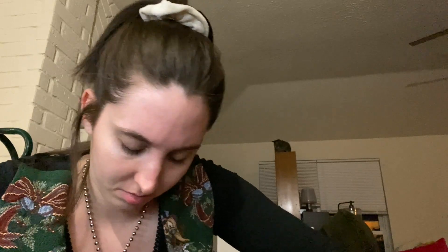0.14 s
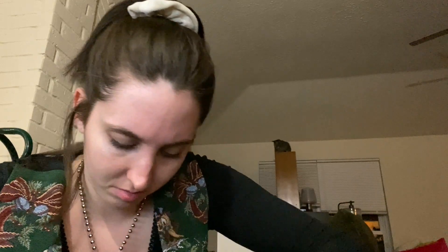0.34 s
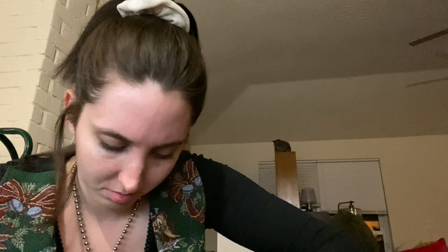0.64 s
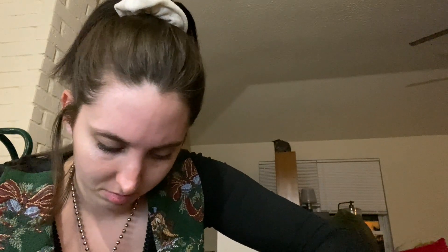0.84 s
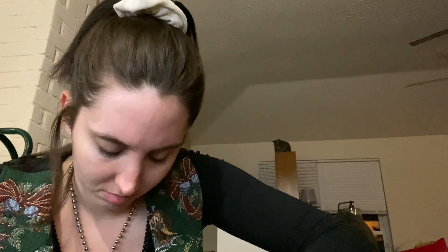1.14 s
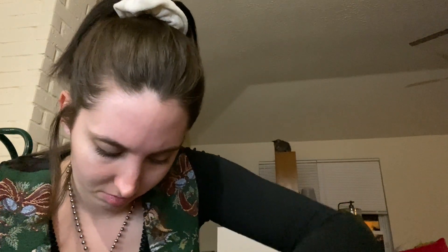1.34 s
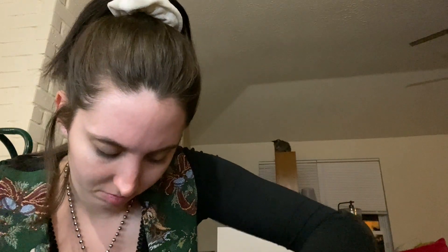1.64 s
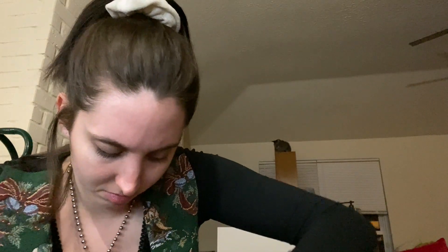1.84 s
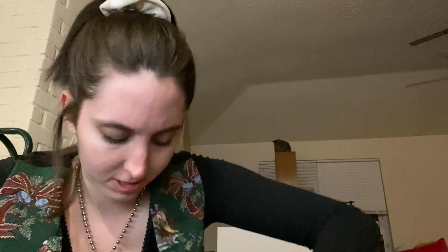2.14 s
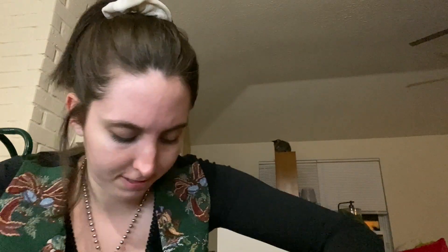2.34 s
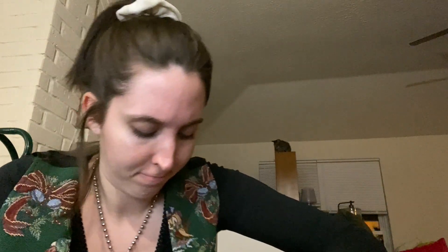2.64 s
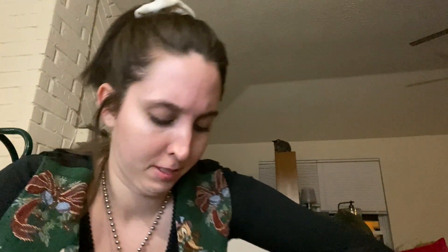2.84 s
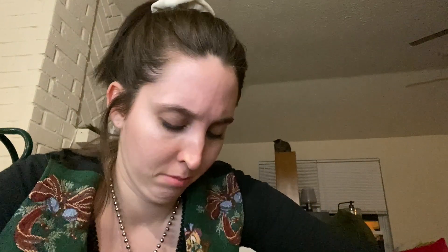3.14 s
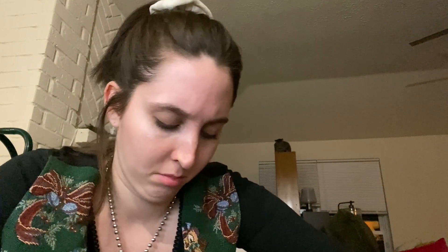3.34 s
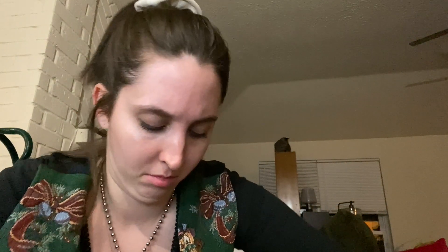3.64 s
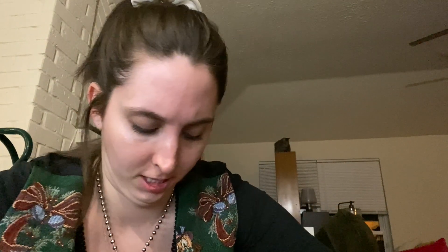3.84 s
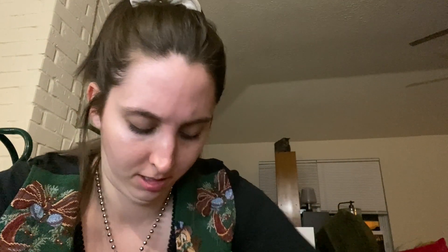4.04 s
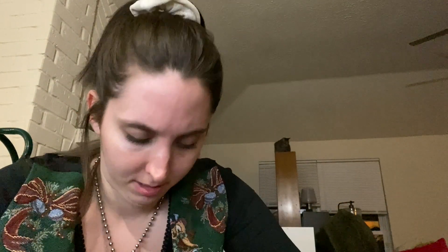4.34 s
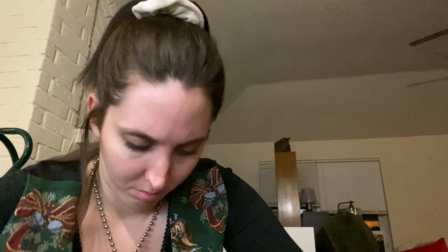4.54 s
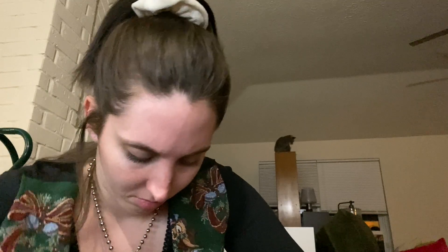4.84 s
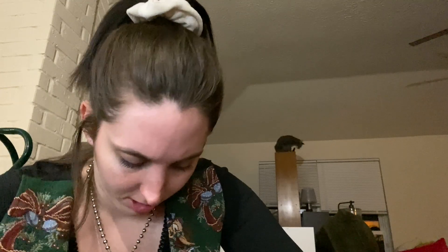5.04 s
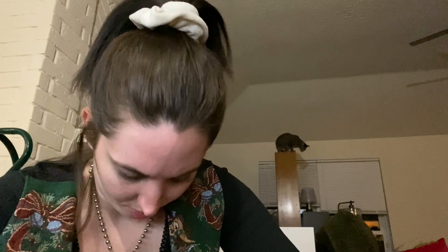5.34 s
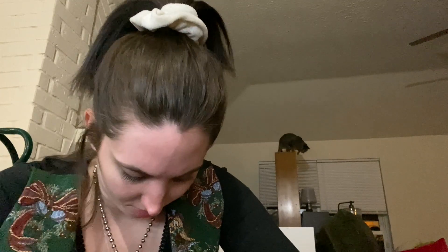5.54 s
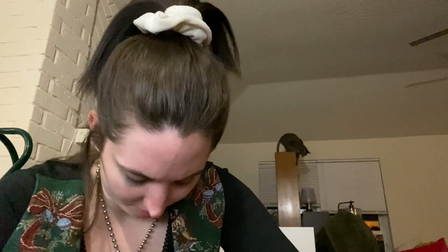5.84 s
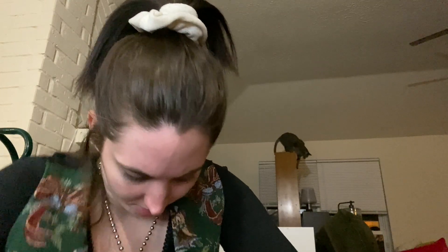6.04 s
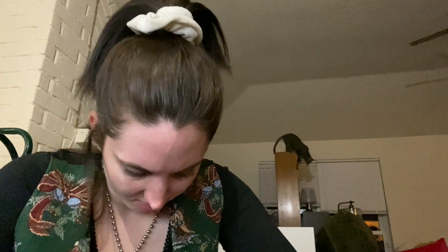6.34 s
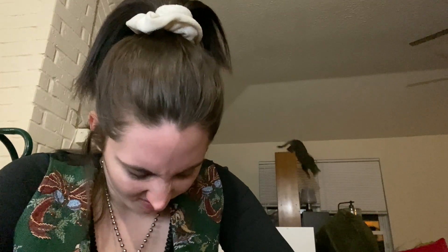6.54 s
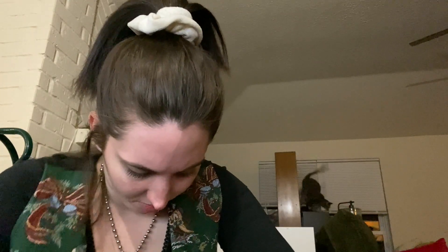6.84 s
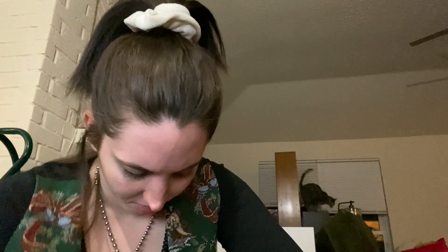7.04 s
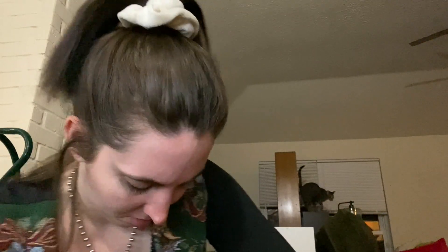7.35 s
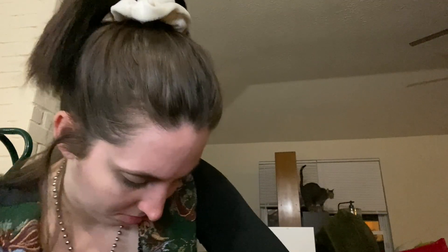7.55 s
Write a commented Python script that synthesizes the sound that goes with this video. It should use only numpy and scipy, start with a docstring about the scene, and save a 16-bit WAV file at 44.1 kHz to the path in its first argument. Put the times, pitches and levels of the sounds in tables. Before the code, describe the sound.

A close stereo pickup in a quiet, modestly echoing living room, with a faint low hum beneath. From 0 to 2.7 s fingers rub and pick at a taped cardboard box: soft papery hiss, scattered dry crinkles, brief tape squeaks, with ticks thickening after 1.1 s. At 2.8 and 2.96 s two sharp cracks start the seam. Lighter buckles and rubs follow, growing busy around 3.9 to 4.4 s. At 4.5 s a loud cluster of pops bursts out, then more at 5.15, 5.8, 6.35 and 7.1 s, each a hollow, woody snap with a bright edge, a short echo, and fibres crackling and board scraping after it. A short squeak comes near 5.4 s. Padded bumps land around 6.0, 6.5 and 6.7 s, and tiny high metal bead rings are barely audible. Small crinkles and knocks finish by 7.6 s.

```python
"""Fingers rub and pick at a taped cardboard box: the board crinkles, squeaks and bumps.
Then the seam gives way in a series of loud pops, and fibres crackle on after each one.
Every break runs through the board as a bending wave, treble first, and rings out in the living room.
Handling is built from tiny random slips, squeaks and bumps from gliding tones, the house from coloured noise.
A few beads ring faintly on top."""
import sys
import numpy as np
from scipy import signal
from scipy.fft import rfft, irfft, next_fast_len
from scipy.io import wavfile
from scipy.ndimage import map_coordinates

SR = 44100
rng = np.random.default_rng(int(sys.argv[2]) if len(sys.argv) > 2 else 0)


def unload_wav(signal):
    """Save mono or channel-first audio to the path in sys.argv[1] as 16-bit WAV at rate SR, clipped to [-1, 1]."""
    wavfile.write(
        sys.argv[1],
        SR,
        np.round(np.clip(np.atleast_2d(signal).T, -1, 1) * 32767).astype(np.int16),
    )


N = 338688
SNAP_SIZE = 8192  # samples in one break
SNAP_LEAD = SNAP_SIZE // 16  # samples before the 3 kHz part of a break arrives


def amp(db):
    """Decibels to gain."""
    return 10 ** (np.asarray(db) / 20)


def unit(x):
    """Scale to rms 1."""
    return x / np.sqrt(np.mean(x ** 2) + 1e-20)


def along(points, hz):
    """Read (Hz, value) points on a log-frequency axis."""
    f, v = np.transpose(points)
    return np.interp(np.log(hz + 1), np.log(f), v)


def bump(hz, centre_hz, octaves):
    """A bell on the log-frequency axis, top 1."""
    return np.exp(-.5 * (np.log2((hz + 1) / centre_hz) / octaves) ** 2)


def wobble(rate):
    """A smooth random curve with rate knots a second."""
    knots = rng.standard_normal(int(N * rate / SR) + 4)
    return map_coordinates(knots, [np.arange(N) * rate / SR])


def filtered(x, gain):
    """Apply a gain that depends on frequency, with padding for the tail."""
    size = x.shape[-1]
    padded = next_fast_len(size + SNAP_SIZE)
    spectrum = rfft(x, padded) * gain(np.fft.rfftfreq(padded, 1 / SR))
    return irfft(spectrum, padded)[..., :size]


def add(track, sound, start):
    """Mix a stereo sound into the track from a start sample on."""
    part = track[:, max(start, 0):][:, :sound.shape[1]]
    part += sound[:, :part.shape[1]]


# How alike left and right are in diffuse sound. Each row: frequency in Hz, likeness from 0 to 1.
ALIKE = [(60, 0.87), (150, 0.84), (300, 0.64), (650, 0.17), (2000, -0)]


def diffuse(pair, colour):
    """Colour two unrelated signals and make their bass alike at both microphones; rms 1."""
    def mid_side_gain(hz):
        turn = np.arccos(np.clip(along(ALIKE, hz), -1, 1)) / 2
        return amp(along(colour, hz)) * [np.cos(turn), np.sin(turn)]

    mid, side = filtered(pair, mid_side_gain)
    return unit(np.array([mid + side, mid - side]))


# Colour of a break in the board. Each row: frequency in Hz, level in dB per Hz.
BOARD = [(30, -30), (70, 6.5), (130, 6), (280, -3), (500, -7.5), (850, -2), (1300, -4.5), (1900, -5),
         (2700, -10), (3600, -14), (5000, -18.5), (8000, -19.5), (12000, -21.5), (16000, -29)]
LAG_MS = .17  # half of this is the left-right delay of the first arrival at 1 kHz


def snap(band_db, peaks, travel_ms, crack_ms, echo_db, slip_db, loss=0.098, count=7):
    """One break sends bending waves through the board; band_db sets boom, thump, body and crack."""
    hz = np.fft.rfftfreq(SNAP_SIZE, 1 / SR)
    khz, ms = hz / 1000, np.arange(SNAP_SIZE) * 1000 / SR
    # the wave comes straight, then again and again from the edges and folds
    detours = 1.4 + .7 * (np.arange(count) + rng.random(count))
    paths = travel_ms * np.r_[1, detours][:, None]
    echoes = amp(echo_db) * rng.choice([-1, 1], count)
    sizes = np.r_[1, echoes][:, None] * np.sqrt(travel_ms / paths)
    # bending waves travel as the root of frequency, so each arrival is a falling chirp
    decay = loss * (paths - travel_ms)
    waves = sizes * np.exp(-(decay + 4j * np.pi * paths) * np.sqrt(khz))
    # the straight wave reaches the left microphone a little later, the echoes scatter around that lag
    lags = LAG_MS + np.r_[0, rng.normal(0, .2, count)][:, None]
    turn = np.exp(-1j * np.pi * np.sqrt(khz) * lags)
    pair = np.array([(waves * turn).sum(0), (waves / turn).sum(0)])
    # line up the 3 kHz part of the straight wave with SNAP_LEAD
    pair *= np.exp(2j * np.pi * (khz * travel_ms / np.sqrt(3) - hz * SNAP_LEAD / SR))
    # neighbouring fibres slip just after
    slip_ms = rng.uniform(1.487, 12, (count, 1))
    slips = amp(slip_db) * rng.standard_normal((count, 1)) * np.exp(-2j * np.pi * khz * slip_ms)
    pair *= 1 + slips.sum(0)
    # the crack is a bundle of fibres parting at almost once, partly alike at both microphones
    bundle = rng.standard_normal((2, SNAP_SIZE)) + 0.75 * rng.standard_normal(SNAP_SIZE)
    fibres = rfft(bundle * np.exp(-ms / crack_ms))
    fibres /= np.abs(fibres) ** .9  # nearly flat spectrum, phases kept
    # the free piece of board favours the pitches that suit its size: peaks are (Hz, octaves, dB)
    focus = sum(db * bump(hz, centre, octaves) for centre, octaves, db in peaks)
    pair *= amp(along(BOARD, hz) + focus)
    deep, low, middle = (1 / (1 + (hz / edge) ** 6) for edge in (180, 700, 3500))
    shares = (deep, low - deep, middle - low, (1 - middle) * fibres)
    bands = [irfft(pair * share) for share in shares]
    return sum(amp(db) * unit(band) for db, band in zip(band_db, bands))


# The seam gives way. Each row: start in seconds, level in dB, trims of boom, thump and crack in dB,
# thump pitch in Hz, body pitch in Hz, upper resonance in Hz, travel time of the wave at 1 kHz in ms.
TEARS = [(2.801, -9.5, -21.5, -5.5, -6, 417, 740, 2030, 4.5),
         (2.964, -13, -22, -11, -8.5, 563, 1140, 2130, 3.5),
         (4.53, -7.5, -17.5, -6, -14, 390, 1560, 3400, 6),
         (4.541, -20, -28, -1.5, -4.5, 400, 1060, 1500, 4),
         (4.554, -7.5, -33, -25, -16.5, 684, 1440, 1660, 3.5),
         (4.566, -23, -30, -9, -17, 500, 1050, 1650, 3.5),
         (5.145, -8.5, -13, -7.5, -9.5, 318, 634, 1330, 5),
         (5.171, -12, -34, -7.5, -8, 650, 905, 2300, 4.5),
         (5.181, -20, -28, 2.5, -3.5, 396, 850, 2400, 4.5),
         (5.788, -6, -23.5, -8, -12, 310, 760, 1320, 4.3), (5.804, -12, -46, 0.5, -5, 300, 1300, 940, 4.5),
         (6.355, -7, -26, -10, -10.5, 344, 1310, 1520, 5.8),
         (7.098, -6.5, -13, -6, -10.5, 318, 1085, 1670, 4), (7.11, -12.5, -13, -14, -28, 280, 790, 1270, 3)]


def tears(focus_db, boom_db=-13, thump_db=-13, body_db=-21, crack_db=-16, upper_share=0.71,
          strain_db=-21, strain_s=0.0066):
    """Fibres strain for a moment, then a stretch of the seam lets go and the whole panel jumps."""
    out = np.zeros((2, N))
    rise = np.exp(np.arange(-SNAP_SIZE // 4, 0) / SR / strain_s)
    for s, db, boom, thump, crack, thump_hz, body_hz, upper_hz, travel_ms in TEARS:
        levels = db + np.array([boom + boom_db, thump + thump_db, body_db, crack + crack_db])
        peaks = [(thump_hz, 0.33, focus_db),
                 (body_hz, 0.14, focus_db),
                 (upper_hz, 0.11, upper_share * focus_db)]
        pop = snap(levels, peaks, travel_ms, crack_ms=1.02, echo_db=-1.0, slip_db=-63.0)
        add(out, pop, round(s * SR) - SNAP_LEAD)
        strain = diffuse(rng.standard_normal((2, len(rise))), BOARD) * rise
        add(out, amp(db + strain_db) * strain, round(s * SR) - len(rise))
    return out


# The board buckles under the fingers. Each row: start in seconds, level in dB, thump trim in dB,
# crack trim in dB, body pitch in Hz, travel time of the wave at 1 kHz in ms.
CRINKLES = [(0.134, -29, -2.5, 0.5, 680, 3.03), (0.769, -54, -22.5, 5.5, 2950, 2.6),
            (1.104, -27.5, -9.5, -2, 1770, 2.62), (1.316, -37, -13, -1.5, 2100, 2.5),
            (1.413, -45, -6, 1, 1600, 2.9), (1.424, -30, -16, -2.5, 1310, 3.7),
            (1.435, -40.5, -13, 8.5, 2360, 2.5), (1.551, -41.5, 4.5, -5, 915, 9.2),
            (1.63, -26.5, -8, -12.5, 1020, 1.8), (1.854, -43, 5, -6, 696, 7.8),
            (2.145, -31, -7.5, -19, 1000, 2.04), (2.26, -27.5, -8.5, -12.5, 1030, 4.5),
            (2.299, -39.5, -19, -3.5, 1300, 3), (2.351, -33, -6, -34, 990, 1.9),
            (2.372, -35.5, -6, -28, 1250, 1.9), (2.393, -37.5, -11, -32, 1100, 2),
            (2.589, -35.5, -6, -15, 1000, 2.3), (2.639, -32, -15, -16, 1300, 1.85),
            (2.657, -31, 2.5, -16.5, 730, 3.65), (2.767, -29, -37, -16, 1320, 4),
            (3.145, -33, 3.5, -9, 1700, 5.5), (3.312, -36.5, 2, -11, 915, 3),
            (3.397, -44, 2, -8, 905, 11.6), (3.662, -36.5, -9, -10.5, 1100, 4),
            (3.854, -27.5, -8.5, -10, 2490, 4.2), (3.88, -33, 1, -15, 900, 3.07),
            (3.974, -32, -18, -22, 1030, 1.67), (4.101, -22, -3.5, -14.5, 1400, 2.6),
            (4.148, -34, -4, -15, 1160, 1.44), (4.189, -33, 2, -13, 910, 5),
            (4.241, -28.5, 0.5, -13, 1140, 3), (4.248, -29, -4, -26, 820, 3.54),
            (4.394, -32, 1.5, -19, 922, 2.4), (4.718, -29, -8, -15.5, 1190, 9.2),
            (4.843, -32.5, -6, -17, 1000, 3.5), (4.88, -38.5, 3, -16, 1040, 8.2),
            (4.905, -34.5, -6, -18, 1294, 10), (4.997, -40, 1.5, -22, 1310, 7.4),
            (5.039, -32, 0, -20, 1280, 7.2), (5.098, -60, -12, 13.5, 3000, 4.6),
            (5.352, -38, 2, -18, 1700, 9.6), (5.398, -41, -13, 0, 2000, 2.7),
            (5.516, -31.5, -7.5, -34, 1050, 2.66), (5.605, -35, -1.5, -15, 1290, 12.2),
            (5.99, -35.5, 7.5, -5, 800, 3.8), (6.082, -39.5, -20, -9, 1400, 2.5),
            (6.515, -24.5, -7.5, -20, 1060, 6.9), (6.906, -48, 2, -0.5, 900, 4),
            (6.948, -45.5, 3.5, -12, 1190, 3), (6.974, -44.5, 0.5, -8, 1100, 4.7),
            (7.287, -30.5, 2, -11.5, 930, 4.4), (7.391, -39, 4, -7, 700, 6),
            (7.495, -42, -1, -9, 1010, 4.8)]


def crinkles(focus_db, boom_db=-26, thump_db=-14, body_db=-21, crack_db=-16, thump_hz=450,
             echo_db=3, echo_loss_db_per_ms=0.86):
    """Small buckles: a light one is a short chirp, a heavy one shakes the whole flap and creaks on."""
    out = np.zeros((2, N))
    for s, db, thump, crack, body_hz, travel_ms in CRINKLES:
        weight = np.clip(thump / 10, -1, 1)  # from light to heavy
        boom = thump + boom_db + 3 * weight
        levels = db + np.array([boom, thump + thump_db, body_db, crack + crack_db])
        flap_hz = thump_hz * np.exp(rng.normal(0, 0.17) - 0.12 * weight)
        peaks = [(flap_hz, 0.33, focus_db), (body_hz, 0.45, focus_db)]
        tick = snap(levels, peaks, travel_ms, crack_ms=0.98,
                    echo_db=echo_db + 1.4 * weight - echo_loss_db_per_ms * travel_ms,
                    slip_db=-14.5 + 6.7 * weight)
        add(out, tick, round(s * SR) - SNAP_LEAD)
    return out


# How briskly the hands work on the box. Each row: time in seconds, effort in dB.
EFFORT = [(0.0, -57.5), (0.35, -50), (0.97, -63.5), (1.17, -50.5), (1.28, -54), (1.52, -44), (1.78, -52.5),
          (2.1, -44), (2.7, -46), (3.42, -42.5), (3.72, -50.5), (4.2, -46), (4.8, -42.5), (4.94, -56),
          (5.11, -50), (5.22, -40.5), (5.39, -37.5), (5.5, -44), (5.7, -49), (6.2, -42), (6.6, -48.5),
          (6.86, -52.5), (7.05, -51.5), (7.35, -52.5), (7.68, -50.5)]
# the handling dips under tension just before a tear: depth, lead, half length
HUSH_DB, HUSH_LEAD_S, HUSH_S = 3.5, 0.044, 0.029
# the freed flap scrapes after a tear: effort re the tear level, time to its peak, slopes
FLAP_DB, FLAP_DELAY_S = -32.5, 0.17
FLAP_RISE_DB_PER_S, FLAP_FALL_DB_PER_S = 204, 55


def movement():
    """Sliding effort in dB: the hands, a hush before each tear and the freed flap's scrape after it."""
    t = np.arange(N) / SR
    hush, flap_db = np.zeros(N), np.full(N, -np.inf)
    for s, db, *_ in TEARS:
        hush = np.maximum(hush, np.exp(-((t - s + HUSH_LEAD_S) / HUSH_S) ** 2))
        late = t - s - FLAP_DELAY_S
        slope_db = np.minimum(FLAP_RISE_DB_PER_S * late, -FLAP_FALL_DB_PER_S * late)
        flap_db = np.maximum(flap_db, db + FLAP_DB + slope_db)
    hands_db = np.interp(t, *np.transpose(EFFORT))
    return np.maximum(hands_db, flap_db) - HUSH_DB * hush


def friction(colour, rate, spread_db, smooth, travel_ms):
    """Tiny slips of uneven size, spread into chirps by the board, over a smooth rub; rms 1."""
    sizes = amp(spread_db * np.minimum(rng.exponential(size=N), 3))
    slips = (rng.random(N) < rate / SR) * sizes  # rate is slips a second
    grains = unit(slips * rng.uniform(-1, 1, (2, N)))
    chirps = filtered(grains, lambda hz: np.exp(-4j * np.pi * travel_ms * np.sqrt(hz / 1000)))
    return diffuse(chirps + smooth * rng.standard_normal((2, N)), colour)


# Colour of the shaken panels. Each row: frequency in Hz, level in dB per Hz.
PANEL = [(40, 0.5), (120, 4), (250, 1), (420, 5.5), (600, -13.5), (900, -7), (1500, -20), (2500, -32),
         (5000, -101), (10000, -66)]
# Colour of the paper face. Each row: frequency in Hz, level in dB per Hz.
SURFACE = [(500, -26), (1500, 7), (2500, 5.5), (4500, 4.5), (12500, 0.5), (16000, -4.5)]
# paper hiss at the usual effort, and its dB per dB of effort
HISS_DB, HISS_GROWS, USUAL_EFFORT_DB = -57.5, 0.79, -45.5


def handling(moving_db, panel_db=-2.0):
    """Sliding hands shake the panels and hiss on the paper face."""
    hiss_db = HISS_DB + HISS_GROWS * (moving_db - USUAL_EFFORT_DB)
    shaking = friction(PANEL, rate=260, spread_db=5.0, smooth=0.97, travel_ms=4.03)
    panel = unit(amp(2.06 * wobble(40)) * shaking)
    hissing = friction(SURFACE, rate=790, spread_db=7.5, smooth=1.4, travel_ms=1.434)
    face = unit(amp(3.0 * wobble(36)) * hissing)
    return amp(moving_db + panel_db) * panel + amp(hiss_db) * face


# Colour of fibres parting inside the board. Each row: frequency in Hz, level in dB per Hz.
CRACKLE = [(250, -4.5), (700, 5.5), (1800, -7), (3000, -17.5), (8000, -21)]


def crackle(moving_db, level_db=-5.0, after_tear_db=-24, fade_db_per_s=130, clump_db=5.0, count=4):
    """Fibres give way in dense clumps, each pitch region in its own time, most of all after a tear."""
    t = np.arange(N) / SR
    power = amp(moving_db + level_db) ** 2
    for s, db, *_ in TEARS:
        power = power + (t > s) * amp(db + after_tear_db - fade_db_per_s * abs(t - s)) ** 2
    grains = friction(CRACKLE, rate=400, spread_db=4.0, smooth=0.1, travel_ms=2.5)
    clumps = np.zeros((2, N))
    for k in range(count):
        swell = amp(clump_db * np.tanh(wobble(70)))
        clumps += swell * filtered(grains, lambda hz: bump(hz, 450 * 2 ** k, 0.5))
    return np.sqrt(power) * unit(clumps)


# Fingertips and nails drag over tape and board. Each row: middle in seconds, half length in seconds,
# level in dB, centre in Hz, width in octaves, unevenness in dB.
RUBS = [(0.663, 0.13, -59.5, 4860, 1.4, 5), (1.324, 0.0082, -42, 890, 0.26, -1.5),
        (1.514, 0.023, -42.5, 3300, 0.7, -1), (1.505, 0.091, -51.5, 1040, 1.6, 6),
        (1.55, 0.49, -52, 5970, 3, 1), (1.624, 0.011, -38, 880, 1.1, 4), (1.881, 0.051, -42, 220, 1.5, 3),
        (2.215, 0.031, -46.5, 1790, 1.9, 4), (3.147, 0.0063, -34, 1290, 0.73, -1),
        (3.565, 0.028, -41.5, 435, 0.96, 2.5), (3.88, 0.14, -49.5, 7000, 3, 6.5),
        (4.16, 0.089, -38.5, 790, 0.48, -1), (4.391, 0.014, -37, 700, 0.78, 3),
        (4.497, 0.047, -47, 6950, 1.1, 5.5), (4.792, 0.019, -46.5, 8000, 1.9, 3),
        (5.378, 0.025, -42.5, 2000, 0.24, 3), (5.388, 0.032, -46.5, 8000, 0.9, 4),
        (6.208, 0.025, -46, 650, 0.9, 4), (6.719, 0.03, -44, 484, 1.37, 4),
        (7.67, 0.025, -46.5, 8460, 0.8, 11)]


def rubs(level_db=0):
    """Each short drag chatters in its own band, and catches and slips as it goes."""
    t, out = np.arange(N) / SR, np.zeros((2, N))
    flat = [(100, 0), (16000, 0)]
    chatter = friction(flat, rate=560, spread_db=1.5, smooth=0.69, travel_ms=4.8)
    grip = wobble(130)
    for s, half_s, db, hz, octaves, uneven_db in RUBS:
        near = np.flatnonzero(abs(t - s) < 3 * half_s)
        band = filtered(chatter[:, near], lambda f: bump(f, hz, octaves))
        rasp = unit(band * amp(uneven_db * grip[near]))
        swell = np.exp(-((t[near] - s) / half_s) ** 2)
        add(out, amp(db + level_db) * rasp * swell, near[0])
    return out


# A fingertip squeaks on the tape. Each row: middle in seconds, half length in seconds, level in dB,
# pitch in Hz, glide in octaves.
SQUEAKS = [(0.302, 0.009, -44, 864, 0.194), (1.317, 0.01, -45, 2200, -0.015),
           (1.485, 0.009, -47, 1075, 0.6), (4.06, 0.01, -42.5, 1250, 0.3),
           (4.793, 0.014, -43.5, 1133, -0.42), (5.44, 0.011, -39.5, 1630, 0.14),
           (5.45, 0.012, -45, 1066, -0.16)]


def squeaks(level_db=0, flutter_db=3):
    """Skin sticks and slips on the tape so fast that it gives a short, rough, gliding note."""
    t, out = np.arange(N) / SR, np.zeros((2, N))
    waver, grip = wobble(450), wobble(290)
    for s, half_s, db, hz, glide in SQUEAKS:
        near = np.flatnonzero(abs(t - s) < 3 * half_s)
        u = (t[near] - s) / half_s
        pitch = hz * 2 ** (glide * np.tanh(u) / 2) * (1 + .16 * waver[near])
        phase = 2 * np.pi * np.cumsum(pitch) / SR + rng.normal(0, 0.53, (2, 1))
        note = unit(np.sin(phase) * amp(flutter_db * grip[near]))
        add(out, amp(db + level_db) * note * np.exp(-u ** 2), near[0])
    return out


# A hand or a loose flap bumps softly against the box. Each row: start in seconds, level in dB
# before the common trim, settled pitch in Hz.
KNOCKS = [(2.576, -27, 370), (5.391, -36, 360), (5.991, -17.5, 369), (6.103, -27, 178), (6.55, -26, 310),
          (6.715, -24, 249), (6.738, -24, 342), (7.337, -28, 402), (7.495, -29, 380)]


def knocks(level_db=1, attack_s=0.0028, t60=0.053, stiffen=0.23, settle_s=0.0034):
    """A padded blow has no crack: the panel gives a few cycles that sag in pitch as it relaxes."""
    t, out = np.arange(SR // 6) / SR, np.zeros((2, N))
    shape = (1 - np.exp(-(t / attack_s) ** 2)) * amp(-60 * t / t60)
    for s, db, hz in KNOCKS:
        pitch = hz * (1 + stiffen * np.exp(-t / settle_s))
        phase = 2 * np.pi * np.cumsum(pitch) / SR + rng.normal(0, 0.3, (2, 1))
        add(out, amp(db + level_db) * shape * np.sin(phase), round(s * SR))
    return out


# Necklace beads touch. Each row: start in seconds, level in dB before the common trim.
BEADS = [(3.555, -40), (3.62, -40), (5.712, -42), (6.112, -42), (6.74, -41), (6.97, -50)]


def beads(ring_hz=13250, t60=0.17, level_db=-5):
    """Small metal beads ring faintly, all close to one very high pitch."""
    t, out = np.arange(SR // 3) / SR, np.zeros((2, N))
    for s, db in BEADS:
        cycles = (ring_hz + rng.normal(0, 25)) * t + rng.random((2, 1))
        fading = amp(db + level_db - 60 * t / t60)
        add(out, fading * np.sin(2 * np.pi * cycles), round(s * SR))
    return out


# How long the room rings. Each row: frequency in Hz, time to fall 60 dB in seconds.
DECAY = [(100, 0.069), (250, 0.42), (420, 0.42), (800, 0.31), (1500, 0.44), (2500, 0.4), (5000, 0.35),
         (13000, 0.36)]
# The room's strongest resonances. Each row: frequency in Hz, width in Hz, boost in dB.
ROOM_MODES = [(119, 12, 14), (188, 37, 15.6), (274, 18, 2.2), (360, 32, 6.6), (416, 50, 9.06),
              (2400, 460, 3.5)]
# The room's colour. Each row: frequency in Hz, level in dB.
ROOM_COLOUR = [(60, -6), (200, -7.5), (600, 6), (1500, 2.5), (4000, 6), (7000, 5.5), (12000, -4.5),
               (16000, -6.5)]


def room_modes(hz):
    """Standing waves boost narrow bands, each as a resonance beside the direct response."""
    gain = 1
    for f, width, db in ROOM_MODES:
        resonance = 1j * hz * width / (f * f - hz * hz + 1j * hz * width)
        gain = gain + (amp(db) - 1) * resonance
    return gain


def room(x, count=24, build_s=0.0029):
    """Diffuse room answer to both faces of the box, with fresh random tails for each block of time."""
    out, step = np.zeros((2, N)), N // count + 1
    t = np.arange(SR // 2) / SR
    build = 1 - np.exp(-(t / build_s) ** 2)
    for start in range(0, N, step):
        for face in x:
            # noise that dies away at each frequency's own pace
            hz, age, z = signal.stft(rng.standard_normal((2, len(t))), SR, nperseg=256)
            fading = amp(-60 * age / along(DECAY, hz)[:, None])
            tail = signal.istft(z * fading, SR, nperseg=256)[1][:, :len(t)]
            tail = diffuse(tail * build, ROOM_COLOUR) / np.sqrt(len(t))
            add(out, signal.fftconvolve(face[None, start:start + step], tail, axes=1), start)
    return filtered(out, room_modes)


# Colour of the quiet house. Each row: frequency in Hz, level in dB per Hz.
QUIET = [(20, -44), (48, -3.5), (80, -21.5), (120, -5.5), (170, -43), (450, -53), (1500, -38.5),
         (5000, -45), (16000, -100)]


def house(floor_db=-55):
    """The low hum of the house: steady noise gathered in a few bass bands."""
    return amp(floor_db) * diffuse(rng.standard_normal((2, N)), QUIET)


# The box lies a little to the right, though its deepest bass leans left.
# Each row: frequency in Hz, left minus right in dB.
LEAN = [(40, 10), (90, -2.5), (170, -1), (330, -0.8), (650, -2), (2500, -0.4), (12000, -0.1)]


def scene(wet_db=-13.0, small_wet_db=-14):
    """The box and its echo lean to one side; the beads and the house are laid on top."""
    moving_db = movement()
    small = handling(moving_db) + crackle(moving_db) + rubs() + squeaks() + knocks()
    breaks = tears(focus_db=9.5) + crinkles(focus_db=7)
    # the room hears the breaks from all sides of the box, so single pitches stand out less there
    big_send = amp(wet_db) * tears(focus_db=7.5)
    small_send = amp(small_wet_db) * (small + crinkles(focus_db=3.0))
    echo = room(big_send + small_send)
    box = filtered(breaks + small + echo, lambda hz: amp(along(LEAN, hz) * [[.5], [-.5]]))
    return box + beads() + house()


# Treble colour of the whole scene. Each row: frequency in Hz, level in dB.
TREBLE = [(7500, 0), (9200, -5), (11200, 2), (13000, 1), (14800, -6)]
TOP_HZ = 16000  # band limit


def record(dry):
    """A gentle curve shapes the treble, and a steep slope removes what lies above the band limit."""
    return filtered(dry, lambda hz: amp(along(TREBLE, hz)) / (1 + (hz / TOP_HZ) ** 100))


dry = scene()
out = record(dry)
unload_wav(out)
```